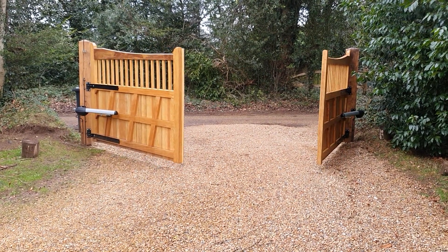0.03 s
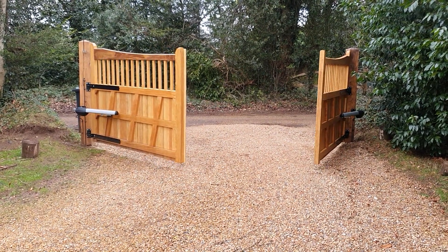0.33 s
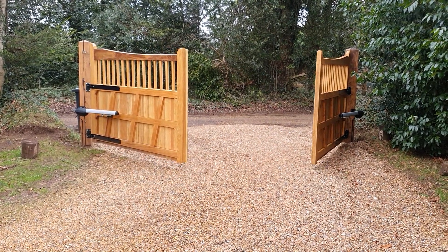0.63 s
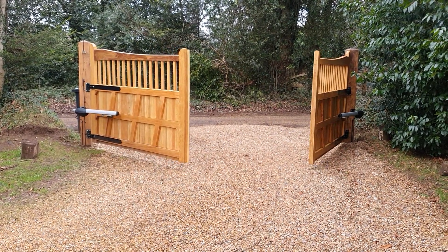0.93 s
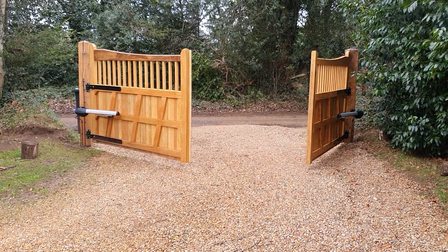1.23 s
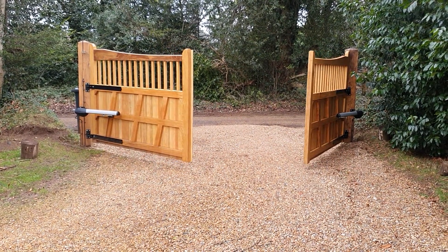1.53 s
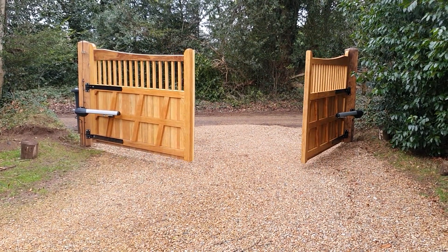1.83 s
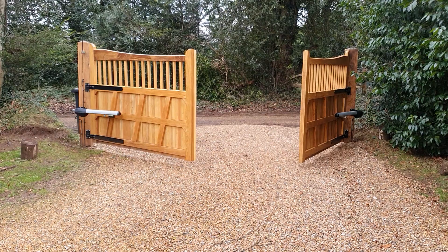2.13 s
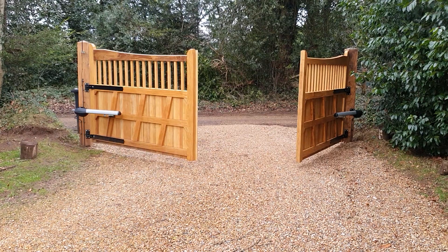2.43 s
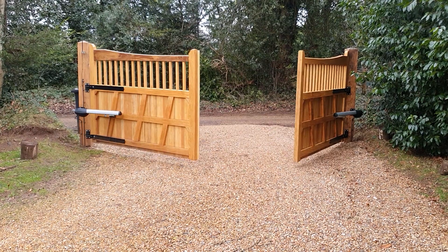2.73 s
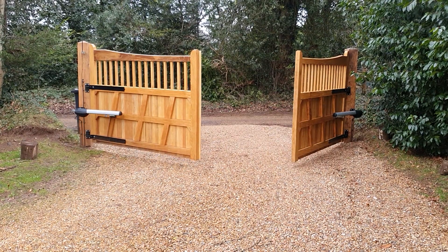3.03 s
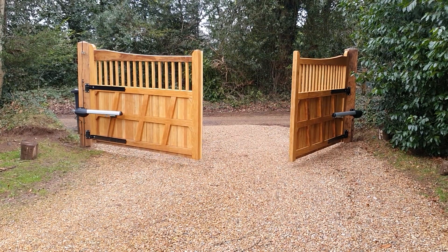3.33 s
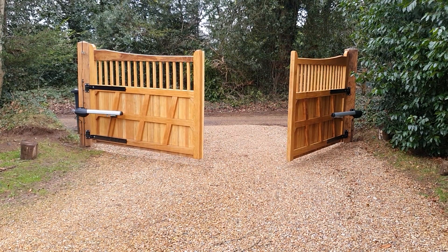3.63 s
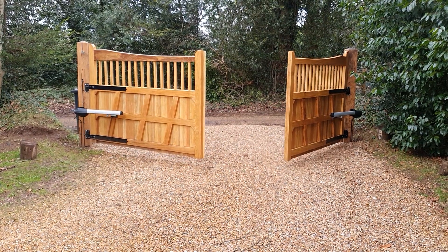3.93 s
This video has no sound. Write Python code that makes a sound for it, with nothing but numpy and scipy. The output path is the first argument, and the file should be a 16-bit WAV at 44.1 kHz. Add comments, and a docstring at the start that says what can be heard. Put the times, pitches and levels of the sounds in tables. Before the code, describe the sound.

Songbirds sing in echoing trees, slightly to the left, over a low distant rumble that wavers and slowly eases. A far warbled phrase opens, then thin, very high whistles run from about 0.8 to 1.7 seconds. A closer bird gives a quick warble until 2.3 seconds, with softer notes lingering to 3. A distant crow caws twice around 3.2 seconds, and a faint rising whistle follows at 3.6.

```python
"""Songbirds in tall trees, heard from a gravel driveway: one thin and very high, two warbling lower.
Each note is a sliding whistle that the wood scatters into a long echo; late on come a distant crow's
hoarse caws and a far whistle. Behind them a rumble, perhaps an aircraft, swells and fades, combed by
its ground reflection, over a deep drone and the wash of the countryside.
Two spaced microphones; the right one is shaded and hears little treble."""
import sys
import numpy as np
from scipy import signal
from scipy.fft import rfft, irfft, next_fast_len
from scipy.io import wavfile
from scipy.ndimage import map_coordinates

SR = 44100
rng = np.random.default_rng(int(sys.argv[2]) if len(sys.argv) > 2 else 0)


def waveform_to_disk(signal):
    """Save audio, clipped to [-1, 1], as 16-bit WAV at the path in sys.argv[1]."""
    frames = np.transpose(np.atleast_2d(signal))
    scaled = np.clip(frames, -1, 1) * 32767
    samples = np.round(scaled).astype(np.int16)
    wavfile.write(sys.argv[1], SR, samples)


N = 4 * SR


def amp(db):
    """Decibels to gain."""
    return 10 ** (np.asarray(db) / 20)


def unit(x):
    """Scale to rms 1."""
    return x / np.sqrt(np.mean(x ** 2) + 1e-20)


def along(points, hz):
    """Read (f/Hz, value) points on a log frequency axis."""
    f, value = np.transpose(points)
    return np.interp(np.log(hz + 1), np.log(f + 1), value)


def timeline(points):
    """Read (t/s, value) points at every sample."""
    return np.interp(np.arange(N) / SR, *np.transpose(points))


def wobble(rate, size=N):
    """A smooth random curve, rate knots a second."""
    return map_coordinates(rng.standard_normal(4096), [np.arange(size) * rate / SR], mode="mirror")


def filtered(x, response):
    """Pass x through a complex frequency response."""
    size = next_fast_len(N + SR // 2)
    return irfft(rfft(x, size) * response(np.fft.rfftfreq(size, 1 / SR)), size)[..., :N]


# How alike noise is at the two microphones: f/Hz, correlation
MIC_LIKENESS = [(50, 1), (150, 1), (260, 1), (400, 1), (600, .92), (930, 0.15), (1300, 0.36), (4000, 0.12)]

def rush(spectrum, ground_gain=0, ground_delay_s=.007666):
    """Stereo noise of rms 1, alike in the bass; a ground reflection, if given, combs it."""
    def response(hz):
        spread = np.arccos(np.clip(along(MIC_LIKENESS, hz), -1, 1)) / 2
        comb = 1 + ground_gain * np.exp(-2j * np.pi * hz * ground_delay_s)
        return amp(along(spectrum, hz)) * comb * np.array([np.cos(spread), np.sin(spread)])
    mid, side = filtered(rng.standard_normal((2, N)), response)
    return unit(np.array([mid + side, mid - side]))


# Countryside, far off, its spectrum: f/Hz, relative level/dB
WASH_SPECTRUM = [(300, -2), (900, 1), (1400, -3.5), (2200, -1.5), (2700, -8.5), (3300, -15), (4200, -25),
                 (6000, -35), (9000, -48.5)]
# Its slow drift: t/s, level/dB
WASH_LEVEL = [(0, -57), (1.3, -60), (2.3, -59), (2.8, -56.5), (3.3, -59), (4, -58)]

def countryside(drift_db=.91):
    """A faint, broad wash from far away that drifts in level."""
    return amp(timeline(WASH_LEVEL) + drift_db * wobble(3)) * rush(WASH_SPECTRUM)


# Deep drone under the rumble: f/Hz, relative level/dB
DRONE_SPECTRUM = [(15, -32), (30, -17.5), (52, -1), (70, -3), (110, -21), (400, -120)]

def drone(level_db=-46):
    """Steady noise, strongest around 50 to 70 Hz."""
    return amp(level_db) * rush(DRONE_SPECTRUM)


# Distant rumble, the spectra of its three bands: f/Hz, relative level/dB
BASS_SPECTRUM = [(15, -58.5), (28, -27), (52, -3.5), (70, 5), (105, 3), (165, 3), (215, -7), (320, -61.5),
                 (1000, -120)]
LOW_MID_SPECTRUM = [(140, -38.5), (215, 0), (270, -2), (400, -6.5), (470, -15), (650, -64), (2000, -120)]
MID_SPECTRUM = [(330, -42.5), (470, -2), (640, -8), (800, -12.5), (1000, -19), (1500, -27.5), (3000, -62.5),
                (6000, -120)]
# How each band swells and fades at the driveway: t/s, level/dB
BASS_LEVEL = [(0, -35), (0.2, -30), (0.4, -34.5), (0.62, -33), (0.85, -37.5), (1.3, -37.5), (1.62, -33),
              (2.0, -40.5), (2.3, -39.5), (2.7, -37), (3.05, -41), (3.35, -40.5), (3.7, -42), (4, -41.5)]
LOW_MID_LEVEL = [(0, -38.5), (0.22, -35.5), (0.5, -42), (0.9, -46), (1.45, -50), (1.72, -42.5),
                 (1.92, -43.5), (2.2, -40), (2.38, -47), (2.6, -41.5), (3.1, -51), (3.45, -45.5),
                 (3.7, -44), (4, -49)]
MID_LEVEL = [(0, -46), (0.35, -46.5), (0.6, -48.5), (0.92, -51), (1.18, -48.5), (1.42, -56), (1.66, -47),
             (1.95, -53.5), (2.33, -56), (2.58, -46.5), (3.0, -58.5), (3.5, -52.5), (3.82, -54), (4, -56)]

def rumble(flutter_db=1.14):
    """A distant roar fades in and out on the moving air, arriving directly and off the ground."""
    bands = [(BASS_LEVEL, BASS_SPECTRUM), (LOW_MID_LEVEL, LOW_MID_SPECTRUM), (MID_LEVEL, MID_SPECTRUM)]
    return sum(amp(timeline(level) + flutter_db * wobble(12)) * rush(spectrum, ground_gain=.37)
               for level, spectrum in bands)


def trees(near_t60, far_t60, far_db, near_rise_s=.012, far_rise_s=.043):
    """Stereo echo: quick scatter from near trunks and a long tail that wells up from the wood."""
    t = np.arange(3 * SR // 2) / SR
    near = amp(-60 * t / near_t60) * (1 - np.exp(-t / near_rise_s))
    far = amp(far_db - 60 * t / far_t60) * (1 - np.exp(-t / far_rise_s))
    tail = rng.standard_normal((2, len(t))) * (near + far)
    return tail / np.linalg.norm(tail[0])


# Crow in the distance: t/s, length/s, level/dB before the throat
CAWS = [(3.129, .115, -57), (3.3, .11, -45.5)]
# Resonances of its throat: f/Hz, relative level/dB
THROAT = [(700, -31.5), (1150, -10), (1450, -3), (1800, 2.5), (2150, -6.5), (2500, -8), (2900, -5.5),
          (3300, -21), (4200, -45.5), (5200, -36.5), (6000, -40), (7000, -53)]

def crow(pitch_hz=340.2, arch_hz=21.82, jitter=.033, rasp=1.1, echo_db=-6):
    """Hoarse caws: unsteady pulses and rasping noise pass through the throat and echo in the trees."""
    source = np.zeros(N)
    for start, length, db in CAWS:
        arch = np.sin(np.linspace(0, np.pi, int(length * SR)))
        hz = (pitch_hz + arch_hz * arch) * (1 + jitter * wobble(250, len(arch)))
        phase = 2 * np.pi * np.cumsum(hz) / SR
        pulses = unit(sum(np.cos(k * phase) for k in range(1, 20)))
        noise = unit(rng.standard_normal(len(arch)) * (1 + np.cos(phase)))
        source[int(start * SR):][:len(arch)] += amp(db) * arch * (pulses + rasp * noise)
    voice = filtered(source, lambda hz: 2 * amp(along(THROAT, hz)))
    echo = signal.fftconvolve(voice[None], trees(near_t60=.14, far_t60=.79, far_db=-14), axes=1)
    return voice + amp(echo_db) * echo[:, :N]


def song(notes, bend, peak_at, waver, buzz, direct_db, echo_db, buzz_hz=168.4, **wood):
    """Each note is a quivering whistle that swells, loses its buzz as it slides home, and echoes."""
    right_lag = round(.00009 * SR)  # the birds sit left of the rumble
    out = np.zeros((2, N + 2 * SR))
    for start, length, start_hz, end_hz, db in notes:
        progress = np.linspace(0, 1, int(length * SR))
        flutter = 1 + buzz * np.sin(2 * np.pi * (buzz_hz * length * progress + rng.random()))
        slide_hz = (start_hz - end_hz) * (1 - progress) ** bend
        hz = (end_hz + slide_hz * flutter) * (1 + waver * wobble(500, len(progress)))
        swell = np.sin(np.pi / 2 * np.interp(progress, [0, peak_at, 1], [0, 1, 0]))
        note = amp(db) * np.sqrt(2) * swell * np.sin(2 * np.pi * np.cumsum(hz) / SR)
        path = amp(echo_db) * trees(**wood)
        path[[0, 1], [0, right_lag]] += amp(direct_db)  # straight to each microphone
        heard = signal.fftconvolve(note[None], path, axes=1)
        out[:, int(start * SR):][:, :heard.shape[1]] += heard
    return out[:, :N]


# Whistle, far off: t/s, length/s, start f/Hz, end f/Hz, relative level/dB
WHISTLE_NOTES = [(3.63, 0.11, 2260, 2600, -65.5), (3.725, .13, 2760, 2850, -64),
                 (3.845, 0.093, 2860, 2920, -60), (3.925, .07, 3080, 2600, -64.5)]

def far_whistler():
    """Four notes from far away climb, then drop at the end."""
    return song(WHISTLE_NOTES, bend=1.2, peak_at=.6, waver=.014, buzz=.8,
                direct_db=1, echo_db=.5, near_t60=.22, far_t60=1.2, far_db=-15)


# A distant phrase, then tones lingering in the trees after the near bird's run:
# t/s, length/s, start f/Hz, end f/Hz, relative level/dB
DIFFUSE_NOTES = [(.135, .06, 3470, 3850, -71), (.195, .055, 3950, 3744, -61),
                 (.274, 0.018, 2940, 3540, -49.5), (.296, .018, 3465, 3000, -57.5),
                 (.345, .05, 2850, 2690, -61), (.345, .09, 3860, 4420, -73.5),
                 (.416, .024, 3500, 3690, -54), (.48, .047, 3950, 3505, -65),
                 (.52, .062, 3180, 3600, -61.5), (.56, .053, 4140, 3810, -68.5),
                 (.63, .053, 3530, 3290, -65.5), (.685, 0.033, 3830, 3764, -64),
                 (.79, .074, 3340, 3720, -77.5), (2.33, .07, 3400, 4010, -59.5),
                 (2.39, .07, 3450, 3224, -60.5), (2.45, .09, 3800, 3720, -64),
                 (2.47, .13, 3170, 2780, -65.5), (2.6, 0.16, 4160, 3790, -77.5),
                 (2.63, .08, 3540, 2950, -63.5), (2.8, .06, 3360, 3220, -72.5),
                 (2.89, .09, 3070, 3490, -71)]

def diffuse_warbling():
    """A distant warbled phrase, then soft, diffuse tones that linger after the near bird's run."""
    return song(DIFFUSE_NOTES, bend=1.2, peak_at=.5, waver=.028, buzz=.3,
                direct_db=0, echo_db=5, near_t60=.42, far_t60=1.1, far_db=-11.5)


# Warble, near the microphones: t/s, length/s, start f/Hz, end f/Hz, relative level/dB
NEAR_WARBLE_NOTES = [(1.702, 0.0081, 3200, 3800, -57.5), (1.713, .02, 3464, 3390, -45),
                     (1.727, .012, 3710, 3850, -52.5), (1.742, 0.015, 3665, 3300, -47.5),
                     (1.776, 0.02, 2950, 2810, -59.5), (1.821, 0.016, 3750, 3380, -52.5),
                     (1.832, .032, 2826, 3610, -44), (1.85, .04, 3600, 4200, -52),
                     (1.935, .07, 4070, 4130, -61.5), (1.997, 0.046, 4680, 4900, -68),
                     (2.01, 0.012, 3300, 3170, -53.5), (2.04, .035, 4200, 4280, -62),
                     (2.105, 0.04, 4080, 3980, -55), (2.138, .036, 3520, 3124, -48),
                     (2.173, .018, 3950, 3720, -51), (2.24, 0.043, 3790, 3845, -51)]

def near_warbler():
    """One quick run of short slides, closer and with more direct sound."""
    return song(NEAR_WARBLE_NOTES, bend=1.15, peak_at=.45, waver=.02, buzz=.2,
                direct_db=3.5, echo_db=5, near_t60=.32, far_t60=1.1, far_db=-13.5)


# Thin song in the trees: t/s, length/s, start f/Hz, end f/Hz, relative level/dB
HIGH_NOTES = [(.04, .08, 8450, 8230, -87), (.812, 0.034, 7620, 7750, -75), (.845, .06, 7800, 8300, -73.5),
              (.94, .085, 8420, 8100, -64.5), (1.055, 0.094, 8100, 7280, -56),
              (1.148, 0.032, 7400, 7570, -60.5), (1.2, 0.12, 8380, 8000, -62.5),
              (1.3, 0.045, 7950, 8390, -60), (1.393, 0.1, 8200, 7220, -57), (1.485, 0.086, 7480, 7420, -63),
              (1.54, 0.096, 8430, 8170, -63.5), (1.658, 0.021, 8280, 8360, -57.5),
              (1.79, 0.19, 8100, 7520, -89), (1.96, .19, 8000, 7520, -91.5), (3.34, 0.11, 8500, 8300, -90)]

def high_bird():
    """Thin whistles around 8 kHz, each swelling late, with only a faint long tail."""
    return song(HIGH_NOTES, bend=1.9, peak_at=.74, waver=.006, buzz=.7,
                direct_db=2.5, echo_db=.5, near_t60=.33, far_t60=.75, far_db=-23)


def scene():
    """From the driveway: the far background, with the birds in front."""
    background = countryside() + drone() + rumble()
    return background + crow() + far_whistler() + diffuse_warbling() + near_warbler() + high_bird()


# Hiss of the microphones: f/Hz, relative level/dB
HISS_SPECTRUM = [(1000, -2), (5000, -3), (7000, -3.5), (9000, -4), (10000, 0), (15700, 0)]
# Shade on the right microphone: f/Hz, level/dB against the left
RIGHT_SHADE = [(60, -.5), (240, -1.2), (600, -2), (930, -3), (1460, -11), (2300, -18), (3500, -18),
               (4400, -12), (5500, -9), (7300, -19), (7700, -13), (8300, -5)]

def record(dry, left_lag_s=.00018, hiss_db=-83.5, top_hz=15720):
    """Two spaced microphones, the left later and the right shaded, with faint hiss and a band limit."""
    def microphones(hz):
        return np.array([np.exp(-2j * np.pi * hz * left_lag_s), amp(along(RIGHT_SHADE, hz))])
    pair = filtered(dry, microphones) + amp(hiss_db) * rush(HISS_SPECTRUM)
    return filtered(pair, lambda hz: hz < top_hz)


dry = scene()
out = record(dry)
waveform_to_disk(out)
```